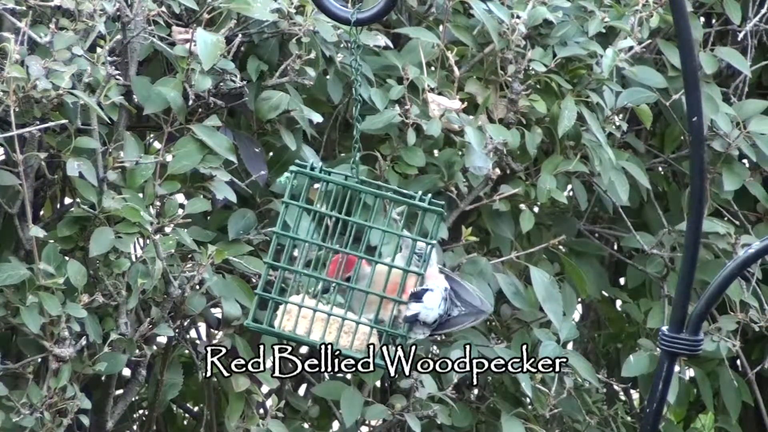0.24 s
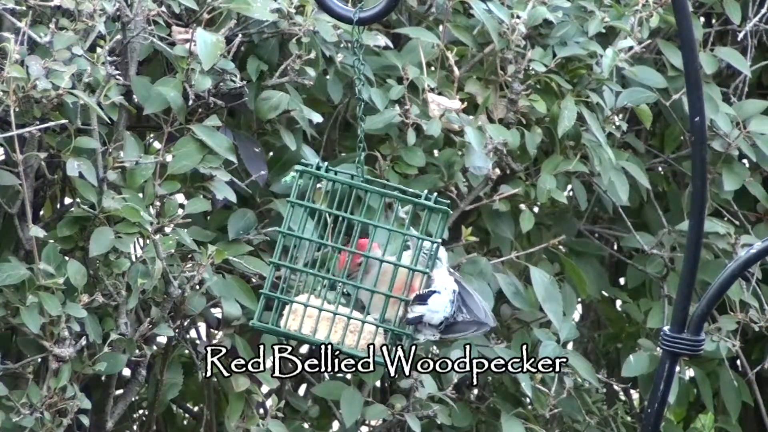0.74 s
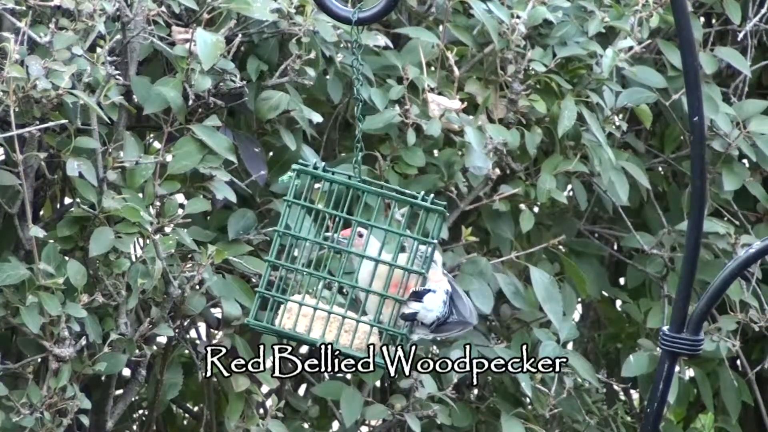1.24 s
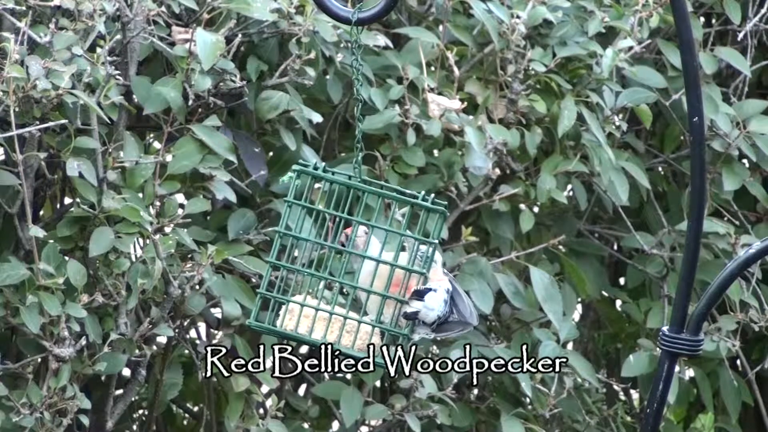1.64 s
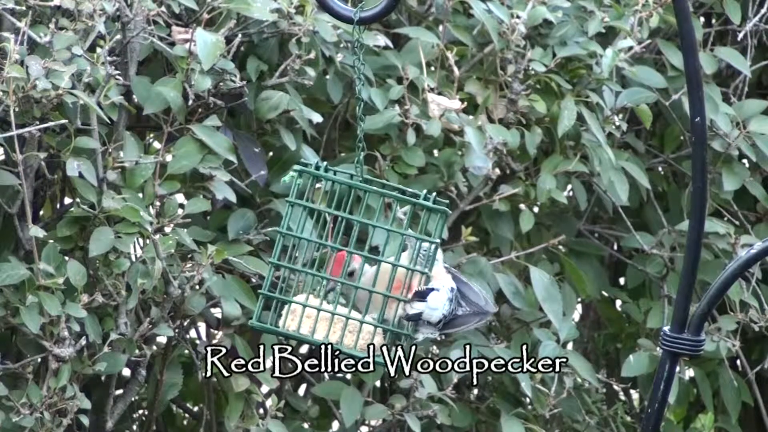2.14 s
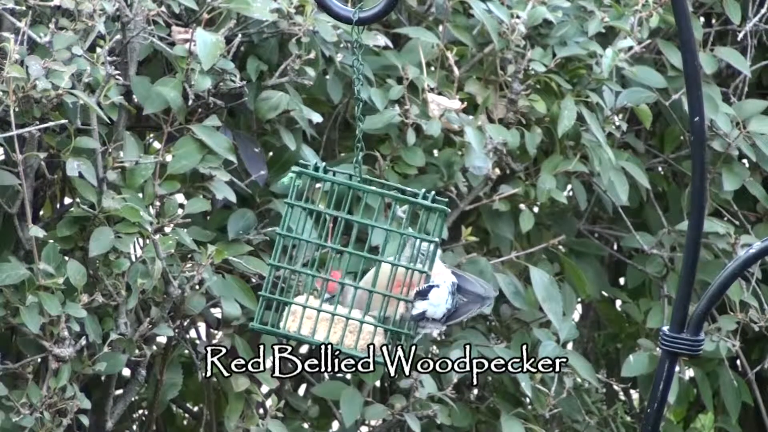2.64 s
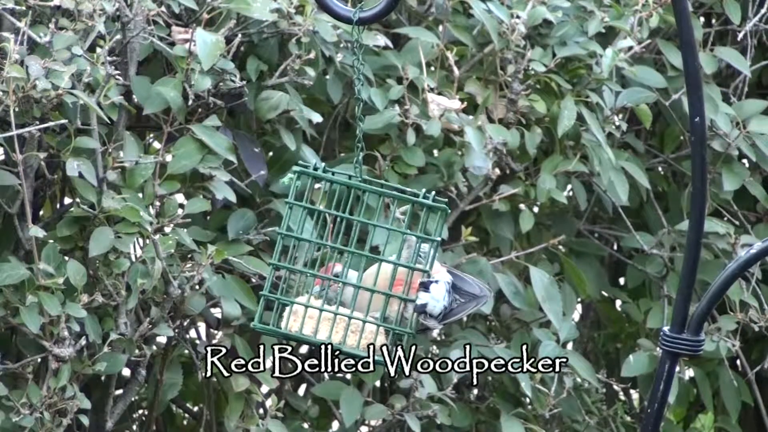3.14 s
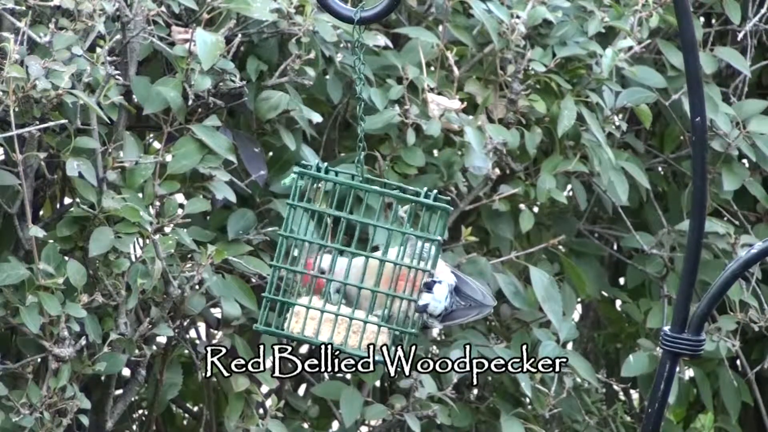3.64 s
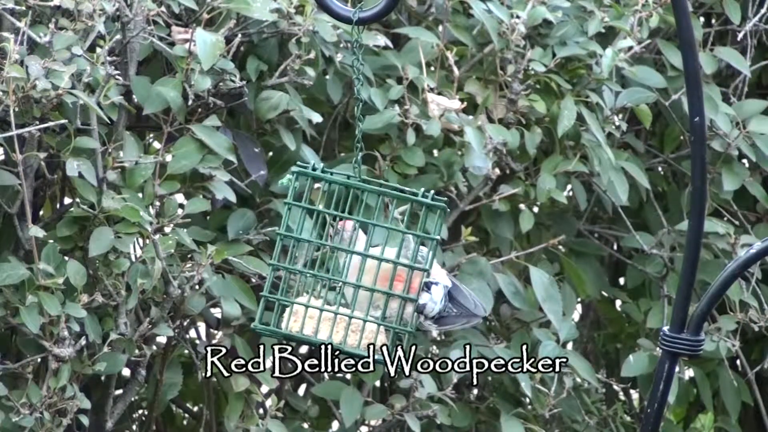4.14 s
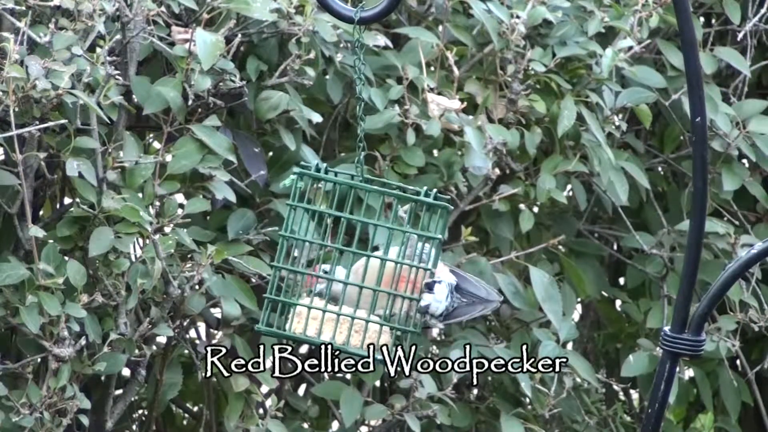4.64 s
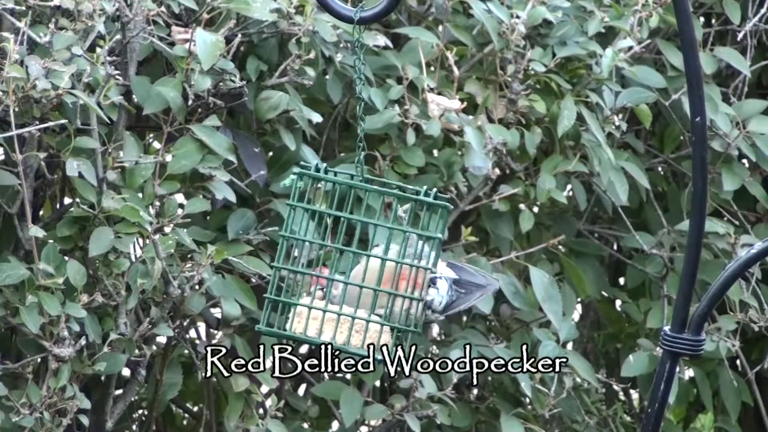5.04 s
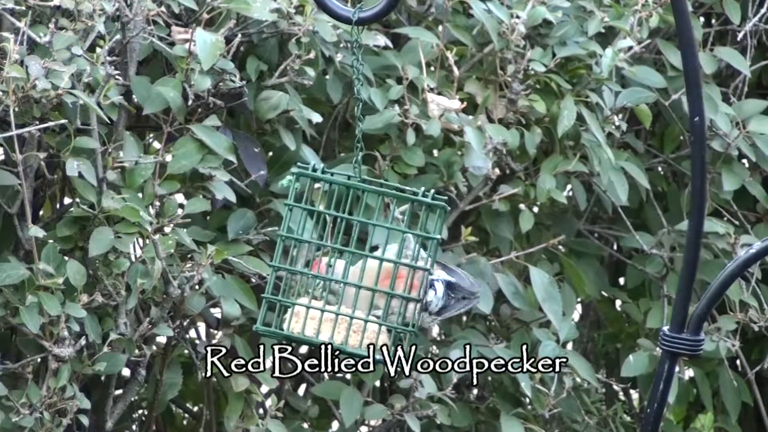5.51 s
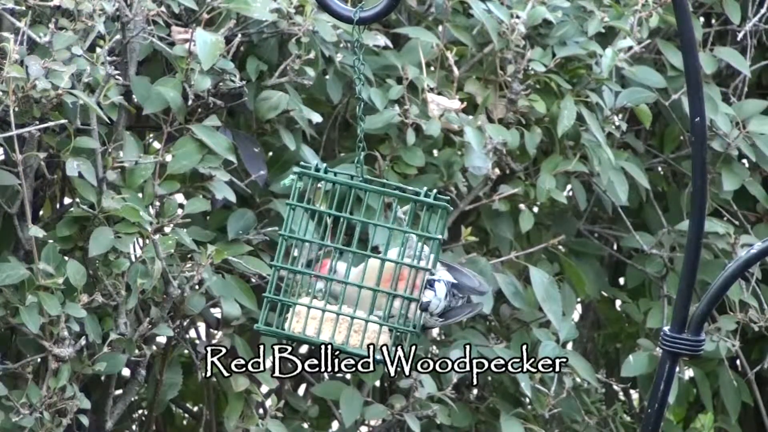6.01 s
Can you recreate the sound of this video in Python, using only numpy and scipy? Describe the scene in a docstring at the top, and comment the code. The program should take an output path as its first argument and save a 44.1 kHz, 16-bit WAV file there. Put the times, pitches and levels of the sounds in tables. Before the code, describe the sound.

A nearby woodpecker calls twice, about four seconds apart, each call a loud, quick, rolling churr with a short echo from the garden around it. Between and after the calls it makes quiet clucks and dry taps with its bill. Far-off songbirds add thin chips and ticks, then two faint upward whistles and some low notes near the end. Soft open-air noise lies under everything.

```python
"""A garden, with one microphone near the feeder. Close by, a woodpecker gives two loud rolling churrs, a
tone from its syrinx arching through its throat's resonances, and makes soft clucks and dry bill taps.
Farther off, songbirds chip, tick, whistle upward and give a few low notes. Ground, fence and walls
reflect the woodpecker; hedge and trees throw every call back over a faint outdoor wash."""
import sys
import numpy as np
from scipy import signal
from scipy.fft import rfft, irfft, next_fast_len
from scipy.io import wavfile
from scipy.ndimage import uniform_filter1d, minimum_filter1d

SR = 44100
rng = np.random.default_rng(int(sys.argv[2]) if len(sys.argv) > 2 else 0)


def generate_wav(signal):
    """Clip the signal to [-1, 1] and save it as 16-bit WAV at the path in sys.argv[1]."""
    frames = np.transpose(np.atleast_2d(signal))
    scaled = np.clip(frames, -1, 1) * 32767
    pcm = np.round(scaled).astype(np.int16)
    wavfile.write(sys.argv[1], SR, pcm)


N = 276507

# The arches of pitch in a churr. Each row: start and length in seconds, starting, top and closing
# pitch in Hz, relative level in dB, squareness (2 is round, more is flat-topped).
CHURR_ARCHES = [ (0.2382, .028, 1290, 1568, 1404, -20.5, 4), (.289, 0.031, 1310, 1646, 1417, -20.5, 2.4),
                (0.322, 0.04, 1406, 1705, 1482, -18.5, 3), (0.380, 0.029, 1227, 1835, 1339, -20, 2),
                (.428, 0.030, 1276, 1820, 1334, -22.5, 1.8), (0.465, .036, 1252, 1908, 1296, -22, 2.2),
                (0.512, .031, 1487, 1927, 1270, -23, 3.02), (0.561, 0.029, 1218, 1840, 1500, -24, 3.42),
                (0.598, 0.027, 1383, 1726, 1505, -30.5, 2.87), (4.1004, 0.04, 1287, 1588, 1337, -22, 6.24),
                (4.152, 0.028, 1267, 1635, 1386, -24.5, 2.4), (4.195, 0.031, 1310, 1754, 1349, -23, 2.2),
                (4.238, .036, 1206, 1855, 1335, -22.5, 2), (4.293, .030, 1296, 1888, 1297, -22.5, 2),
                (4.339, 0.024, 1413, 1944, 1396, -23, 2), (4.379, 0.033, 1230, 1934, 1450, -24, 2.98),
                (4.4316, 0.029, 1248, 1853, 1542, -26, 3.57), (4.467, 0.026, 1428, 1680, 1443, -34.5, 3.44)]
# Quick upward flicks that open a churr and fall between its arches. Each row: start and length in
# seconds, starting and closing pitch in Hz, relative level in dB.
CHURR_FLICKS = [ (0.2137, 0.00908, 1363, 2158, -30.5), (0.2239, 0.0105, 1741, 2383, -28.5),
                (0.232, 0.0053, 1023, 1208, -42.5), (.268, .008, 1258, 1398, -25.5),
                (0.280, 0.0054, 1279, 1577, -23), (0.361, 0.0054, 1296, 1616, -27),
                (0.373, 0.0061, 1241, 1713, -24), (0.416, 0.0082, 1300, 1747, -25),
                (0.501, 0.0079, 1359, 1796, -24), (0.547, .008, 1198, 1676, -22.5),
                (4.0717, 0.0074, 1303, 2085, -33.5), (4.083, 0.0125, 1455, 2550, -30),
                (4.0927, 0.0055, 1027, 1209, -35.5), (4.142, 0.006, 1228, 1408, -28.5),
                (4.183, .007, 1326, 1668, -23.5), (4.229, 0.0081, 1263, 1546, -29.5),
                (4.28, 0.013, 1264, 1864, -25.5), (4.327, 0.01, 1391, 1826, -23.5),
                (4.364, .008, 1322, 1784, -23.5), (4.418, .008, 1216, 1846, -22)]
def syllables(start, end, overlap_s=0.0023, flick_harsh_db=5.5):
    """Arches and harsher flicks melt into one voice: its pitch, effort and extra overtone strength."""
    rows = [(*row, 0) for row in CHURR_ARCHES]
    for s, length, low, high, db in CHURR_FLICKS:
        rows.append((s, length, low, (low + high) / 2, high, db, 1, flick_harsh_db))
    pitch, weight, effort, harsh_db = np.zeros((4, N))
    for s, length, start_hz, mid_hz, close_hz, db, squareness, extra_db in rows:
        if not start - .5 < s < end:
            continue
        age = np.arange(-overlap_s, length + overlap_s, 1 / SR)
        u = np.clip(2 * age / length - 1, -1, 1)
        arch = mid_hz + (np.where(u < 0, start_hz, close_hz) - mid_hz) * abs(u) ** squareness
        edge = np.clip((np.minimum(age, length - age) + overlap_s) / (2 * overlap_s), 0, 1)
        fade = np.sin(np.pi / 2 * edge) ** 2
        add(pitch, s - overlap_s, fade * arch)
        add(weight, s - overlap_s, fade)
        add(harsh_db, s - overlap_s, fade * extra_db)
        add(effort, s - overlap_s, fade * gain_of(db))
    return pitch / (weight + 1e-9), effort, harsh_db


# The woodpecker at the feeder. Each row: time of the first arch and end in seconds, relative
# overtone and rasp levels in dB.
FEEDER_CHURRS = [(0.242, 0.63, -1.5, -35), (4.1, 4.5, 1.5, -29)]
# Its throat and beak, for the tone and then for the overtones. Each row: frequency in Hz, gain in dB.
THROAT_GAIN = [(700, -36.5), (980, -19), (1150, 1.5), (1350, -4), (1550, -1.5), (1720, -2.5), (1850, -10),
               (2050, -6.5), (2250, -7.5), (2700, -16)]
OVERTONE_GAIN = [(2150, -19), (2480, -21), (2850, -59.5), (3150, -39), (3600, -37.5), (3850, -40.5),
                 (4300, -55.5), (5300, -49.5), (7500, -52.5)]
# Air rushing through the syrinx. Each row: frequency in Hz, relative level in dB.
RASP_SPECTRUM = [(500, -31), (1000, -1.5), (1600, 0), (2450, -1.5), (2850, -20.5), (3200, -9), (3800, -6),
                 (4200, -20), (5400, -21.5), (7300, -31.5)]
def churr(start, end, overtone_db, rasp_db, jitter=0.004, lead_s=0.005, clearing_s=0.036):
    """A nearly pure tone arches about 22 times a second, swelling as it crosses throat resonances."""
    hz, effort, harsh_db = syllables(start, end)
    phase = 2 * np.pi * np.cumsum(hz * (1 + jitter * wander(rate_hz=810))) / SR
    swing = np.sqrt(2) * effort * gain_of(wander(rate_hz=290))  # 1 dB of shimmer
    # the call opens hoarse, with a second tone an octave below, then clears
    hoarse = np.clip(1 - (np.arange(N) / SR - start + lead_s) / clearing_s, 0, 1)
    grainy = sum(np.sin(k * phase + 0.81 * wander(rate_hz=230)) for k in range(2, 5))
    upper = gain_of(overtone_db + harsh_db - 1.5 * hoarse) * grainy
    lower = np.sin(phase) + gain_of(-0.5 * hoarse - 33 * (1 - hoarse)) * np.sin(phase / 2)
    voice = coloured(swing * lower, THROAT_GAIN) + coloured(swing * upper, OVERTONE_GAIN)
    return voice + effort * gain_of(rasp_db) * noise(RASP_SPECTRUM)


# Hiss on top of the first churr. Each row: time in seconds, centre in Hz, level in dB.
HISS_PATH = [(.21, 7400, -60.5), (.27, 7420, -64.5), (0.338, 7220, -69), (0.401, 6895, -63),
             (0.502, 7000, -64.5), (0.58, 6660, -62.5), (0.63, 6670, -72.5)]
def thin_hiss(width_hz=480):
    """A narrow band of hiss high above the voice; it slips lower as the call goes on."""
    s, hz, db = np.transpose(HISS_PATH)
    t = np.arange(N) / SR
    level = np.interp(t, s, gain_of(db), left=0, right=0)
    phase = 2 * np.pi * np.cumsum(np.interp(t, s, hz)) / SR
    return level * wander(width_hz) * np.sqrt(2) * np.sin(phase)


# Soft clucks and dry bill taps, close by. Each row: start in seconds, relative level in dB, number of
# pulses, their spacing in seconds, low mode and dry click in dB against the high mode.
CLUCKS_AND_TAPS = [ (1.837, -45, 2, 0.0056, -16, -14), (1.8497, -45.5, 2, 0.0105, -3, -9),
                   (2.073, -41, 3, 0.0081, -3, -16), (2.722, -45, 1, .008, 1, -6),
                   (2.9459, -41.5, 2, 0.0068, -5, -3), (3.195, -42, 1, 0.008, -6, -8),
                   (3.2025, -47, 2, 0.007, -4, -8), (3.4608, -47.5, 2, 0.0061, -2, 0),
                   (4.7748, -43, 1, .008, -15, -11), (5.1047, -35.5, 2, 0.0069, -21, -13),
                   (5.2937, -39, 2, .0072, -14, -11), (5.5004, -31.5, 2, 0.0076, -14, -38),
                   (5.515, -35, 2, 0.0091, -9.5, -13), (5.7403, -44, 3, .0065, 1.5, -13),
                   (5.9522, -35, 1, 0.008, -20, -22), (5.968, -34.5, 1, 0.008, -13, -19)]
# The high and low modes each pulse rings. Each row: frequency in Hz, seconds to fall 60 dB.
PULSE_MODES = [(1610, 0.014), (655, 0.014)]
def clucks_and_taps(level_db=6, pulse_fade_db=-1.5, rise_s=0.0011, click_decay_s=0.0019):
    """One to three dry pulses in quick succession, each a click that rings for a few milliseconds."""
    rings, clicks = np.zeros((2, N))
    t = np.arange(SR // 50) / SR
    for s, db, pulses, spacing, low_db, click_db in CLUCKS_AND_TAPS:
        for k in range(round(pulses)):
            size = gain_of(level_db + db + k * pulse_fade_db) * (1 - np.exp(-t / rise_s))
            detune = 1 + 0.01 * rng.standard_normal()
            ring = sum(gain_of(mode_db - 60 * t / t60) * np.sin(2 * np.pi * hz * detune * t)
                       for (hz, t60), mode_db in zip(PULSE_MODES, (0, low_db)))
            add(rings, s + k * spacing, size * ring)
            add(clicks, s + k * spacing, size * gain_of(click_db) * np.exp(-t / click_decay_s))
    return rings + dry_clicks(clicks)


# The colour of a pulse's click. Each row: frequency in Hz, relative level in dB.
CLICK_SPECTRUM = [(300, -2.5), (900, 11.5), (2200, -1.5), (3200, -14), (4500, 4), (7000, -39)]
def dry_clicks(envelope):
    """The burst of noise that opens each pulse."""
    return envelope * noise(CLICK_SPECTRUM)


# Chips and tiny falling ticks, well off from the microphone. Each row: time in seconds, relative
# level in dB.
FAR_CHIPS = [(0.374, -50), (2.458, -51), (3.76, -49.5)]
FAR_TICKS = [(1.278, -61.5), (3.962, -56.5)]
# The paths of a chip, its softer, lower side tone and a tick. Each row: seconds from the call's
# time, pitch in Hz, relative level in dB.
CHIP_PATH = [(-0.033, 1750, -26), (-0.021, 2500, -22), (-0.014, 3200, -14), (-0.008, 3450, -15),
             (-0.004, 3760, -5), (0.004, 3770, -2), (0.02, 3590, 1), (0.029, 3720, -5), (0.038, 3630, -3),
             (0.048, 3790, -2), (0.062, 3620, -7), (0.068, 3000, -19), (0.075, 2300, -4),
             (0.088, 1700, -16)]
SIDE_TONE_PATH = [(0.026, 2700, -18), (0.042, 2540, -9), (0.056, 2300, -25.5)]
TICK_PATH = [(-0.005, 4720, -12), (0, 4250, 0), (0.005, 3880, -12)]
def songbird_chips():
    """Each chip leaps up, sags, warbles and drops over a side tone; each tick just falls."""
    def notes(calls, path):
        return [[(s + age, hz, db + rel_db) for age, hz, rel_db in path] for s, db in calls]

    main = notes(FAR_CHIPS, CHIP_PATH) + notes(FAR_TICKS, TICK_PATH)
    side = notes(FAR_CHIPS, SIDE_TONE_PATH)
    return sing(main, waver=0.0082, overtone_db=-27.5) + sing(side, waver=0.04, overtone_db=-41)


# Distant rising whistles. Each row: start and length in seconds, starting and final pitch in Hz,
# relative level in dB, time of a brief break in seconds.
FAR_WHISTLES = [(4.654, 0.4, 1858, 3734, -64, 4.908), (5.713, 0.48, 1611, 3890, -60.5, 6.122)]
def rising_whistles(octaves_per_s=2.1, curl=3.5, break_db=-22, break_half_s=0.011):
    """A whistle climbs steadily, then curls up to its final pitch; it swells, breaks once and fades."""
    u = np.linspace(0, 1, 40)
    notes = []
    for s, length, start_hz, final_hz, db, break_s in FAR_WHISTLES:
        t = s + u * length
        steady = octaves_per_s * length
        octaves = steady * u + (np.log2(final_hz / start_hz) - steady) * u ** curl
        octaves += 0.006 * rng.standard_normal(len(u))  # a little unsteady
        dip_db = break_db * np.exp(-((t - break_s) / break_half_s) ** 2)
        arch_db = -20 * (u - 0.48) ** 2  # loudest near the middle
        notes.append(np.transpose([t, start_hz * 2 ** octaves, db + dip_db + arch_db]))
    return sing(notes, waver=0.021, overtone_db=-30)


# A distant bird's low notes. Each row: start and length in seconds, top pitch in Hz, relative level in dB.
FAR_LOW_NOTES = [(0.798, 0.052, 1750, -41.5), (4.89, 0.056, 1797, -44), (5.826, 0.095, 1463, -39.5),
                 (5.908, 0.048, 1370, -43), (6.022, 0.081, 1420, -47), (6.136, 0.083, 1402, -53)]
def low_notes(droop=0.089, ends_db=-9.5):
    """Short notes whose pitch and level follow one shallow arch."""
    u = np.linspace(0, 1, 15)
    ends = (2 * u - 1) ** 2
    notes = [np.transpose([s + u * length, top_hz * (1 - droop * ends), db + ends_db * ends])
             for s, length, top_hz, db in FAR_LOW_NOTES]
    return sing(notes, waver=0.041, overtone_db=-43)


def sing(notes, waver, overtone_db):
    """A songbird's nearly pure, wavering tone glides along each note's (seconds, Hz, dB) points."""
    out = np.zeros(N)
    drift = 1 + waver * wander(rate_hz=262)
    for note in notes:
        s, hz, db = np.transpose(note)
        t = np.arange(s[0], s[-1], 1 / SR)
        pitch = np.interp(t, s, hz) * drift[round(s[0] * SR):][:len(t)]
        phase = 2 * np.pi * np.cumsum(pitch) / SR
        tone = np.sin(phase) + gain_of(overtone_db) * np.sin(2 * phase)
        level = gain_of(np.interp(t, s, db)) * signal.windows.tukey(len(t), .1)
        add(out, s[0], np.sqrt(2) * level * tone)
    return out


# Ground, fence and walls around the feeder. Each row: delay in seconds, relative gain.
NEAR_SURFACES = [(.0073, 0.44), (.0164, 0.16), (.0317, 0.11), (.043, 0.08), (.06, .09), (.079, 0.05),
                 (0.0972, 0.11), (.123, 0.088)]
# The beak beams its sound forward, so the echoes differ in colour. Each row: frequency in Hz, gain in dB.
BEAK_OFF_AXIS = [(900, -2.5), (1200, 8), (1500, -1.5), (1900, -6), (2400, 6), (5000, 2)]
def feeder_echoes(x):
    """Sound sent off to the sides returns once from each hard surface and scatters in the foliage."""
    spread = coloured(x, BEAK_OFF_AXIS)
    out = gain_of(-12) * foliage(spread, decay=0.26, build_s=0.0059)
    out += gain_of(-16) * foliage(spread, decay=0.71, build_s=0.0019)
    for delay, gain in NEAR_SURFACES:
        add(out, delay, gain * spread)
    return out


def distant(x, direct_db, scatter_db, tail_db):
    """Many nearly equal paths through the hedge make a far note flutter, and the trees ring on."""
    scatter = foliage(x, decay=0.049, build_s=0.0058)
    tail = foliage(x, decay=0.8, build_s=0.0032)
    return gain_of(direct_db) * x + gain_of(scatter_db) * scatter + gain_of(tail_db) * tail


# How long hedge and trees ring. Each row: frequency in Hz, ring time as a multiple of decay.
FOLIAGE_RING = [(500, 3.7), (1500, 2.25), (2600, 2.08), (3700, 1.1), (7500, 1.1)]
def foliage(x, decay, build_s):
    """Scatter from countless leaves and trunks builds up, then dies band by band."""
    taps = rng.standard_normal(2 * SR) * (rng.random(2 * SR) < 2500 / SR)  # 2500 echoes a second
    hz, t, bands = signal.stft(taps, SR, nperseg=256)
    t60 = decay * curve_at(FOLIAGE_RING, hz)[:, None]
    envelope = gain_of(-60 * t / t60) * (1 - np.exp(-t / build_s))
    tail = signal.istft(bands * envelope, SR, nperseg=256)[1]
    return signal.fftconvolve(x, tail / np.linalg.norm(tail))[:N]


# The open air all around the microphone. Each row: frequency in Hz, relative level in dB.
AIR_SPECTRUM = [(15, -42.5), (25, -3.5), (103, 0.5), (178, -3.5), (294, -5), (331, -3.5), (441, -5),
                (560, -2.5), (646, -2.5), (746, -2), (802, -1.5), (1320, -0.5), (2470, -10.5), (4080, -14),
                (7590, -15), (9870, -80), (16700, -120)]
# The bass drops out briefly during each churr. Each row: start and end in seconds.
BASS_DROPOUTS = [(0.252, 0.566), (4.138, 4.42)]
def outdoor_wash(level_db=-56, swell_db=.5, dropout_db=-43.5, bass_hz=210):
    """Faint steady outdoor air, swelling a little. The bass drops out briefly during each churr."""
    air = gain_of(level_db + swell_db * wander(rate_hz=2.8)) * noise(AIR_SPECTRUM)
    bass = signal.sosfiltfilt(signal.butter(8, bass_hz, fs=SR, output="sos"), air)
    t = np.arange(N) / SR
    dropped = sum(1. * ((t > start) & (t < end)) for start, end in BASS_DROPOUTS)
    bass_gain = gain_of(dropout_db * uniform_filter1d(dropped, size=1500))
    return air + (bass_gain - 1) * bass


def gain_of(db):
    """Decibels to amplitude."""
    return 10 ** (np.asarray(db) / 20)


def unit_rms(x):
    """Scales to rms 1."""
    return x / np.sqrt(np.mean(x ** 2) + 1e-20)


def curve_at(points, hz):
    """Joins (Hz, value) points on a log-frequency axis."""
    f, value = np.transpose(points)
    return np.interp(np.log(hz + 1), np.log(f + 1), value)


def add(mix, s, sound):
    """Mixes a sound in at s seconds."""
    part = mix[round(s * SR):][:len(sound)]
    part += sound[:len(part)]


def coloured(x, spectrum):
    """Filters by a (Hz, dB) curve."""
    size = next_fast_len(N, True)
    gain = gain_of(curve_at(spectrum, np.fft.rfftfreq(size, 1 / SR)))
    return irfft(rfft(x, size) * gain, size)[:N]


def noise(spectrum):
    """Noise of rms 1 with the given colour."""
    return unit_rms(coloured(rng.standard_normal(N), spectrum))


def wander(rate_hz, step=8):
    """Smooth random drift of rms 1, up to about the given rate."""
    size = next_fast_len(N // step + 1, True)
    f = np.fft.rfftfreq(size, step / SR)
    coarse = irfft(rfft(rng.standard_normal(size)) * np.exp(-(f / rate_hz) ** 2), size)
    return np.interp(np.arange(N), step * np.arange(size), unit_rms(coarse))


def scene():
    """At the microphone the woodpecker is near and fairly dry; the other birds are far and wet."""
    loud = sum(churr(*row) for row in FEEDER_CHURRS) + thin_hiss()
    soft = clucks_and_taps()
    near = loud + soft + feeder_echoes(loud + .5 * soft)
    chips, rising, low = songbird_chips(), rising_whistles(), low_notes()
    rising *= gain_of(2.2 * wander(rate_hz=40))  # the whistles swell unevenly
    far = distant(chips, direct_db=-0.5, scatter_db=2, tail_db=1.5)
    add(far, 0.22, gain_of(-14.5) * far)  # a far line of trees returns each chip once
    far += distant(rising, direct_db=4, scatter_db=-12, tail_db=3)
    far += distant(low, direct_db=-7, scatter_db=-11.5, tail_db=-10)
    return (near + far + outdoor_wash())[None]


def record(dry, ceiling_db=-17.8, edge_hz=7700):
    """A fast limiter holds the loudest peaks down; a steep low-pass cuts the top treble."""
    wanted = np.minimum(1, gain_of(ceiling_db) / (abs(dry) + 1e-9))
    gain = uniform_filter1d(minimum_filter1d(wanted, size=400), size=400)
    lowpass = signal.firwin(601, edge_hz, window=("kaiser", 8), fs=SR)
    return signal.oaconvolve(dry * gain, lowpass[None], "same")


dry = scene()
out = record(dry)
generate_wav(out)
```